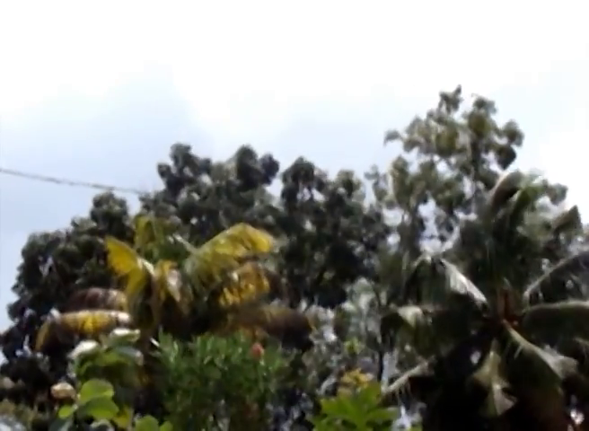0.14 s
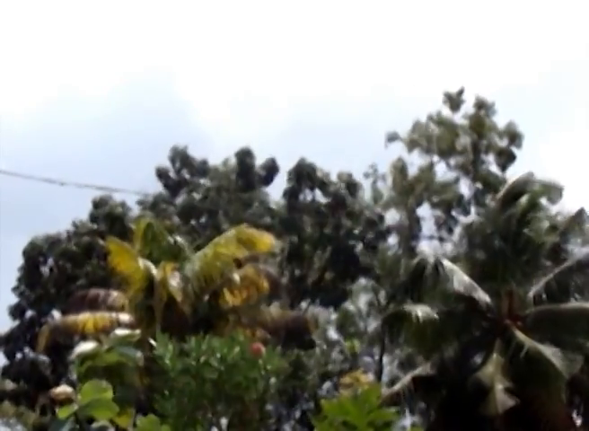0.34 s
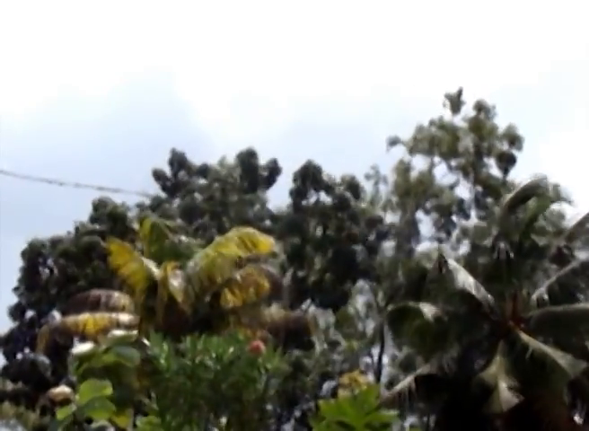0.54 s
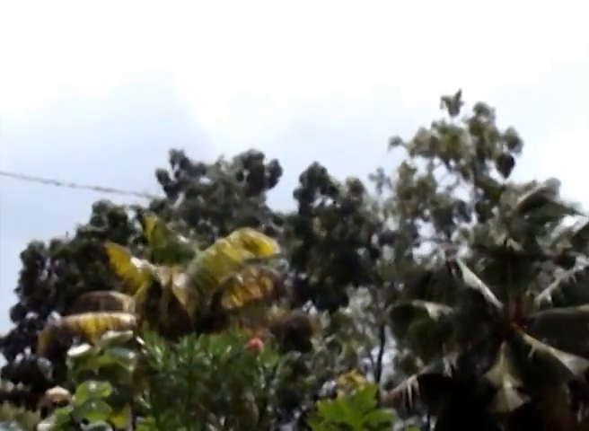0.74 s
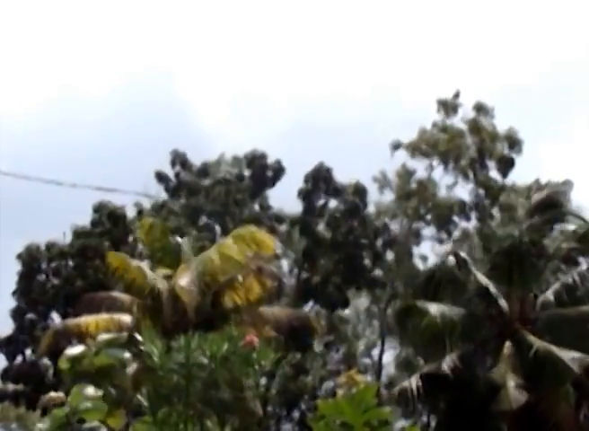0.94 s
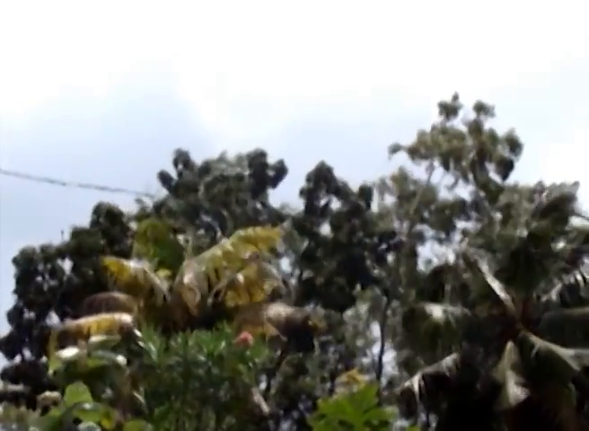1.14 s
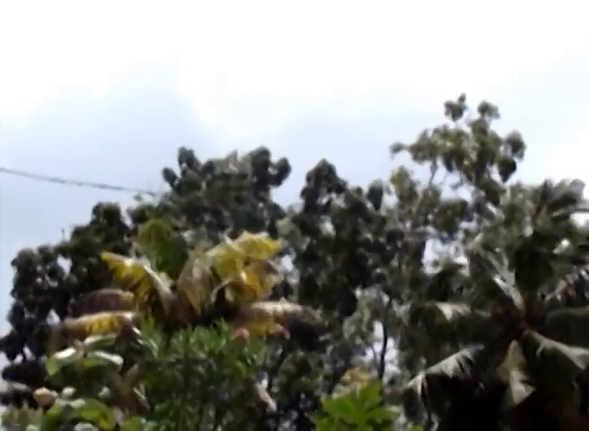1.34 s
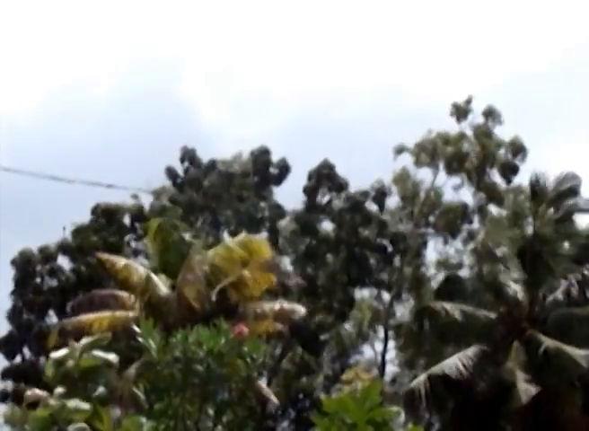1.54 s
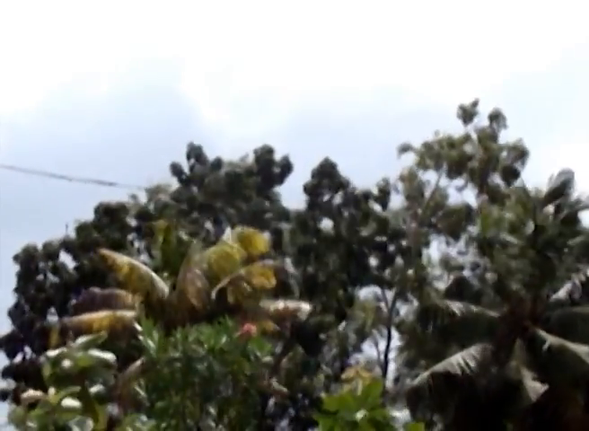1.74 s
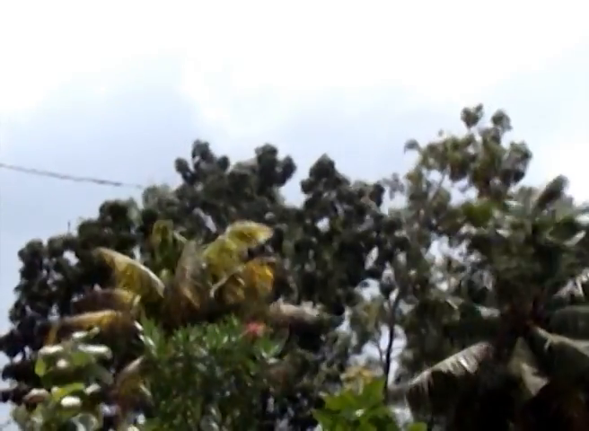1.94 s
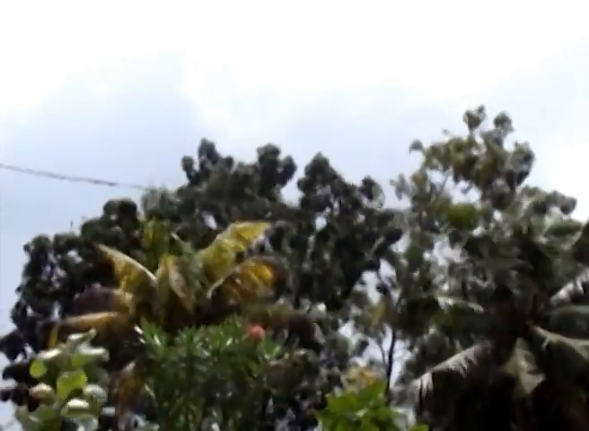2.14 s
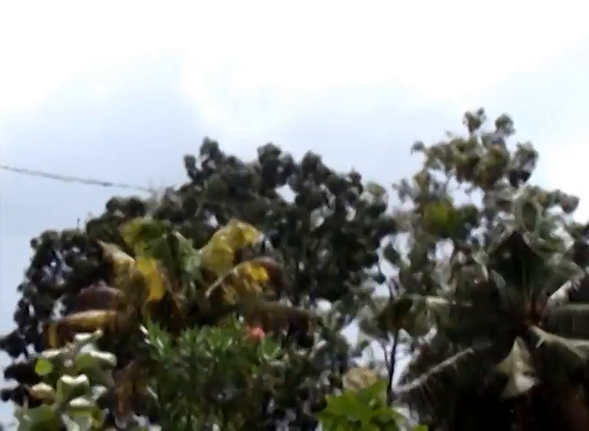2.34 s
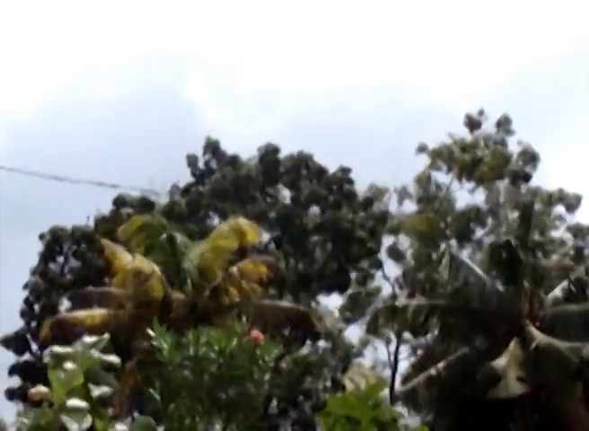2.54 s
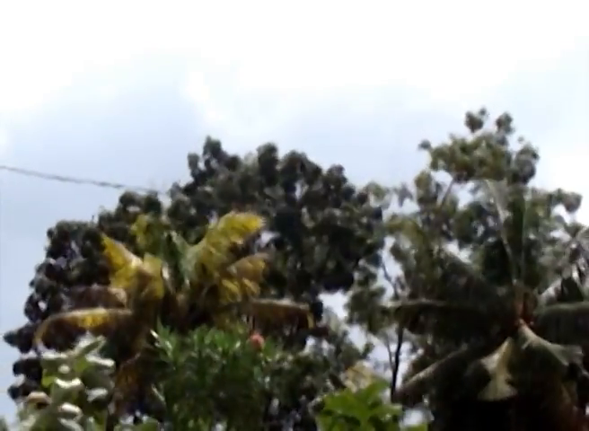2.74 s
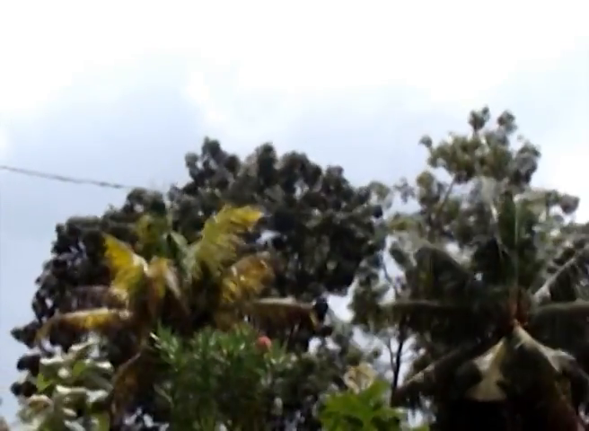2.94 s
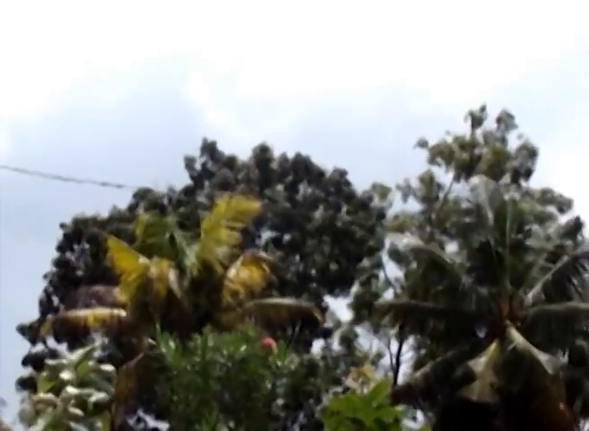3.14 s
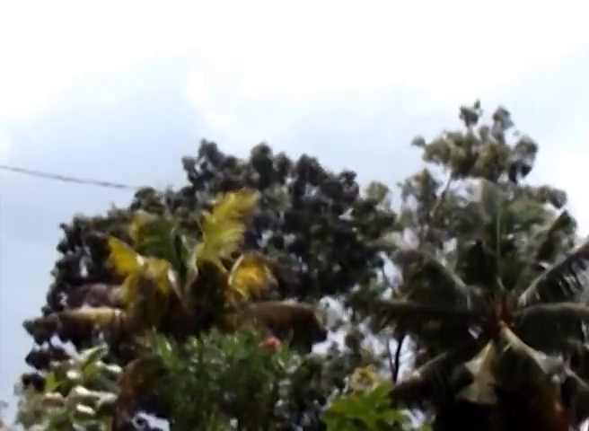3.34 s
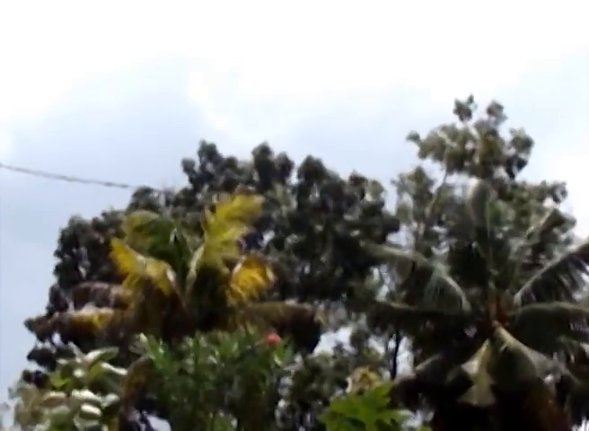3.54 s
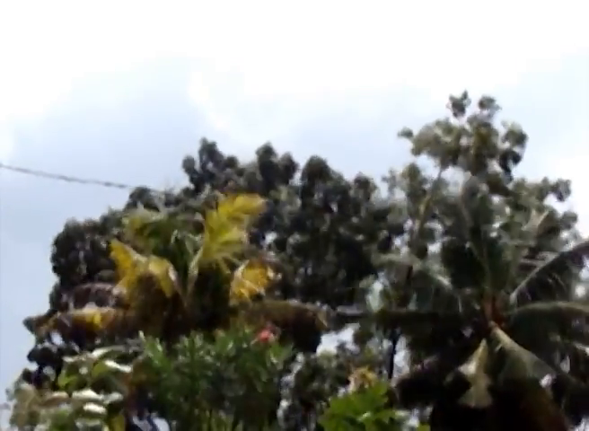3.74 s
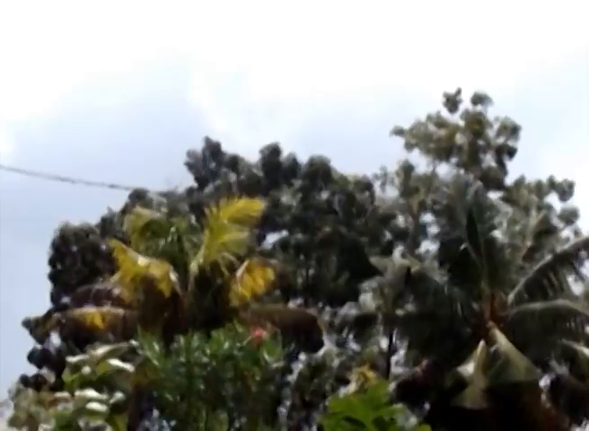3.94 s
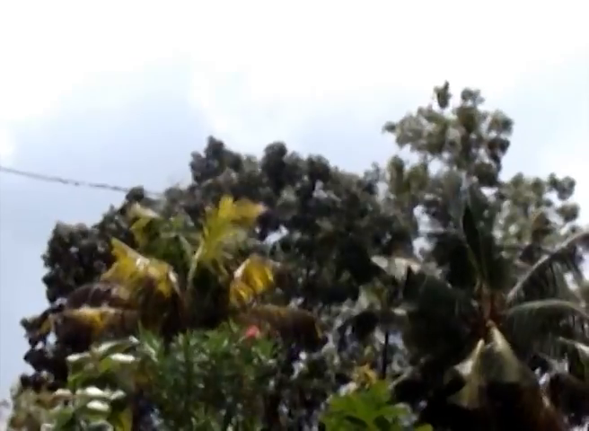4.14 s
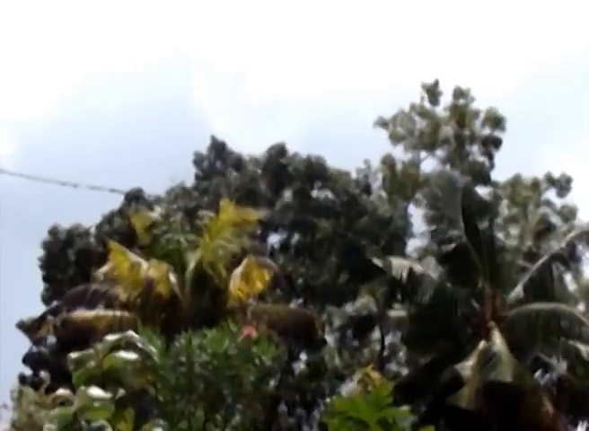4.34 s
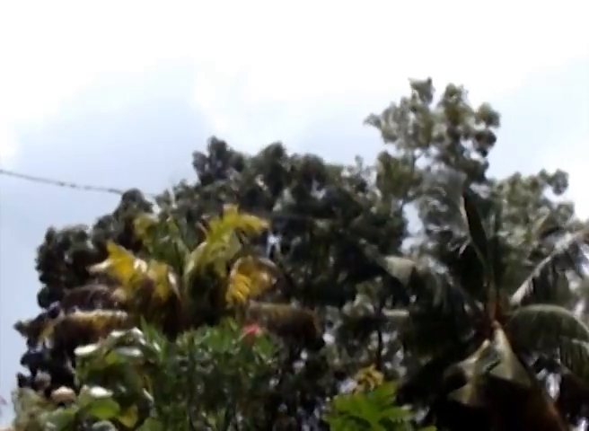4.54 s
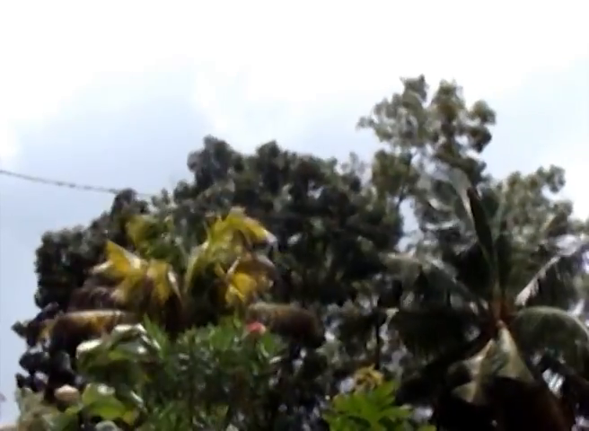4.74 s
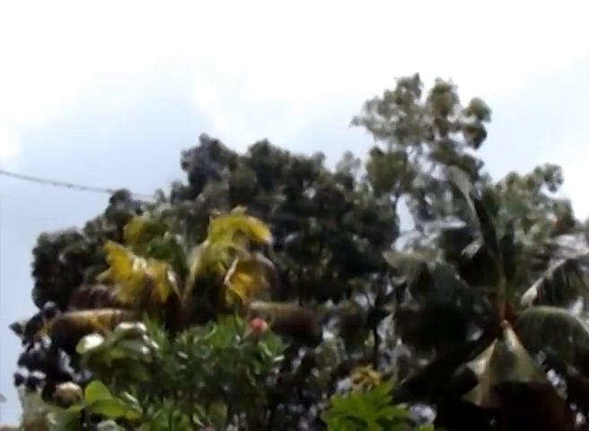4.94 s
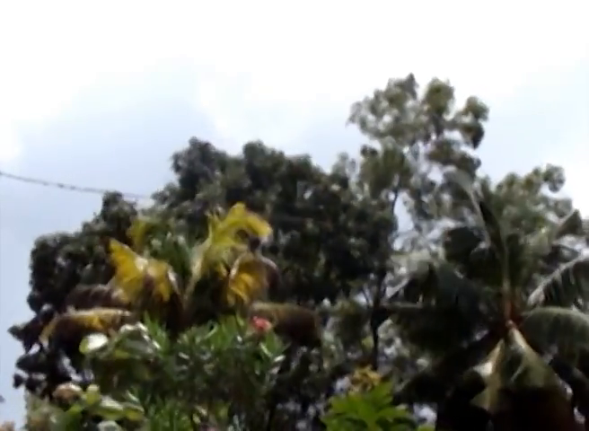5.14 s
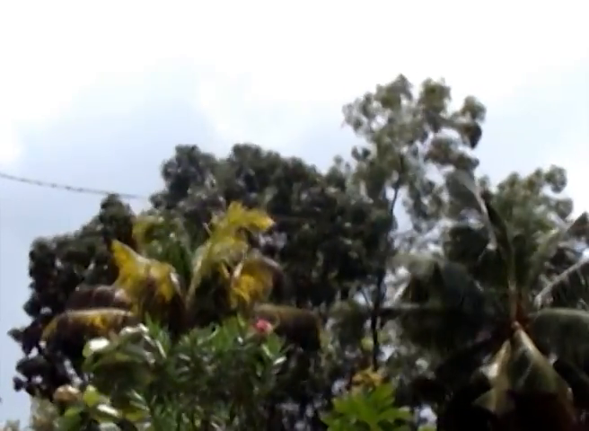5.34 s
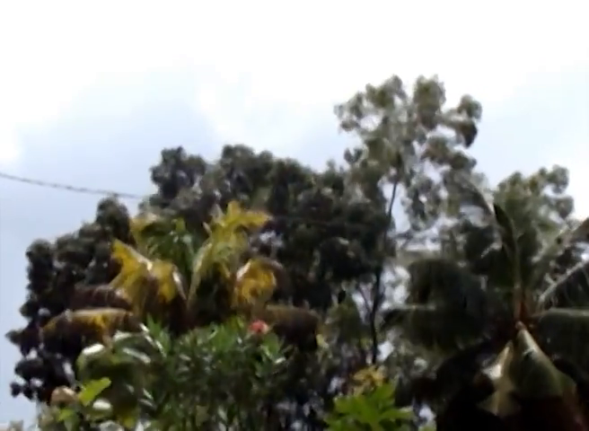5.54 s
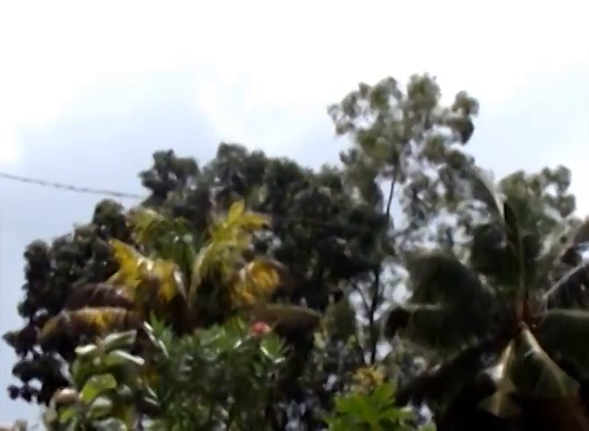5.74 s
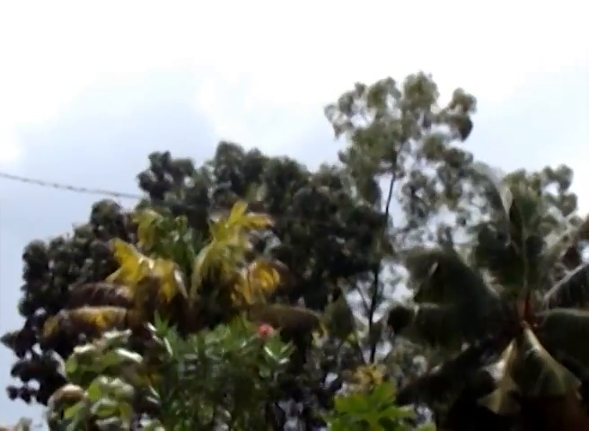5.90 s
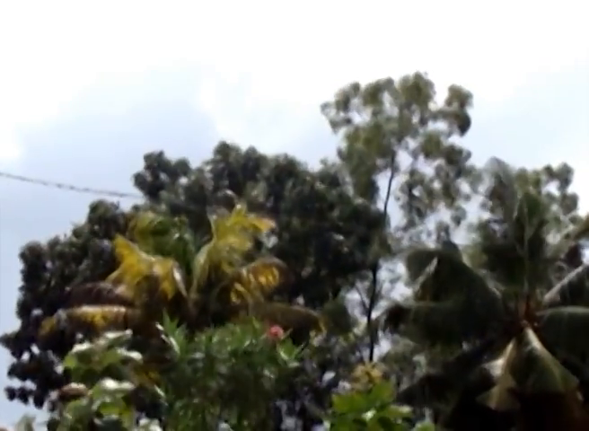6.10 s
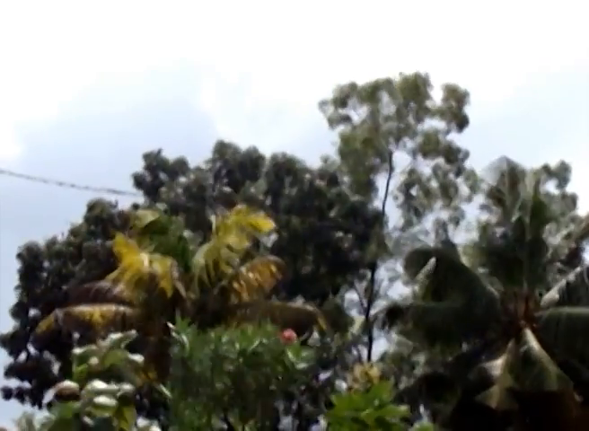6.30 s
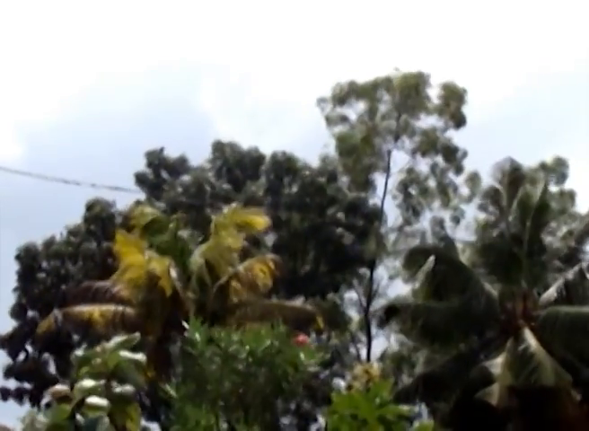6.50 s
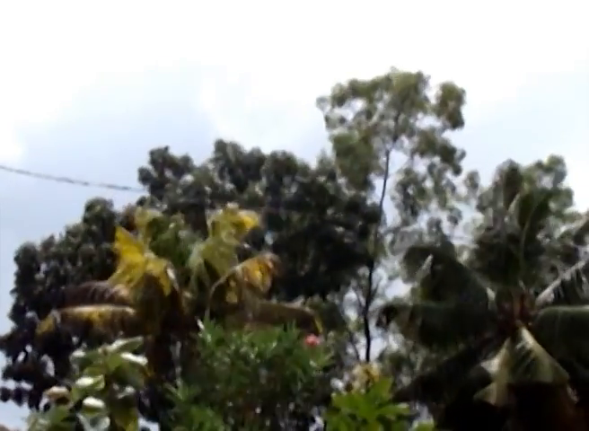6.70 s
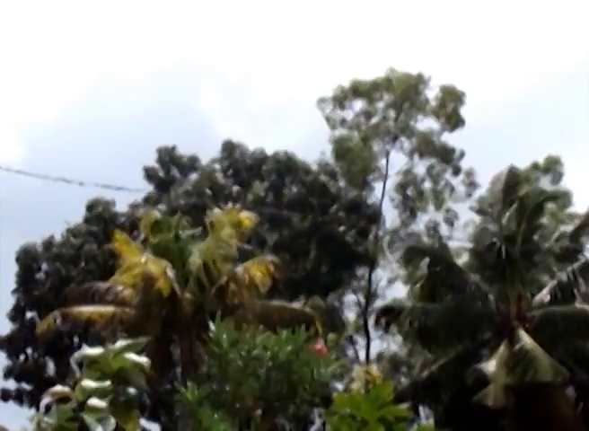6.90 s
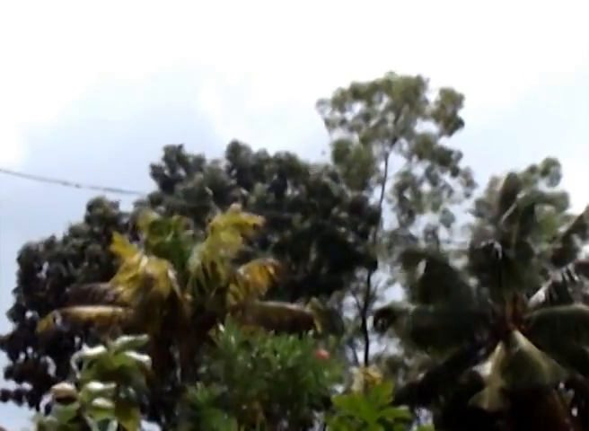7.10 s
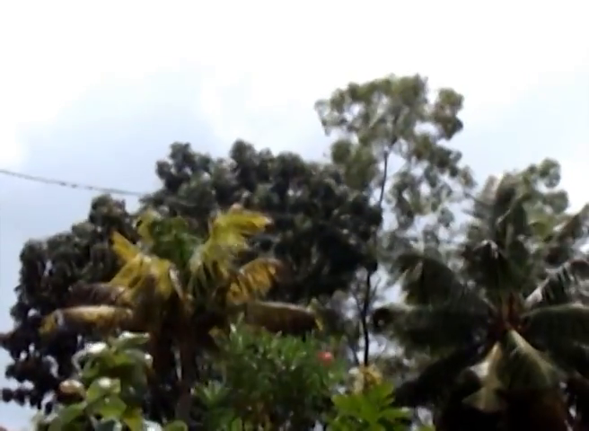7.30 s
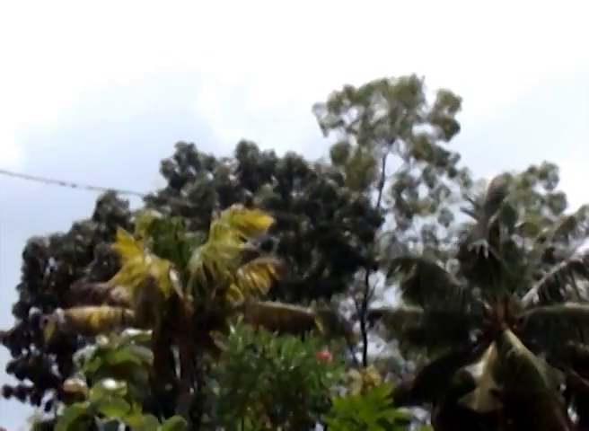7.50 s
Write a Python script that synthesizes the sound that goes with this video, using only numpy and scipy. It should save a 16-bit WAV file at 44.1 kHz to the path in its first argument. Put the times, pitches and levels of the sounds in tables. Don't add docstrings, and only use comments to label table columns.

```python
import sys
import numpy as np
from scipy import signal
from scipy.fft import rfft, irfft, next_fast_len
from scipy.io import wavfile
from scipy.ndimage import uniform_filter1d

SR = 44100
rng = np.random.default_rng(int(sys.argv[2]) if len(sys.argv) > 2 else 0)


def store_wav(level_fs):
    pcm = np.round(np.clip(np.atleast_2d(level_fs), -1, 1) * 32767)
    wavfile.write(sys.argv[1], SR, pcm.T.astype(np.int16))


def undo_db(level):
    steps = np.asarray(level, float) / 20
    return 10 ** steps


N = 337806
T = np.arange(N) / SR

# f/Hz, level/dB per Hz
CROWN_COLOUR = [(15, -71), (25, -37.5), (59, -15.5), (196, -9.5), (221, -7.5), (289, -5), (393, -2.5),
                (425, -3), (612, -2.5), (900, -1.5), (973, -0.5), (1070, 0), (2500, 3), (3250, -32.5),
                (5500, -120)]
RUMBLE_HZ = 241


def unit(x):
    return x / np.sqrt(np.mean(x ** 2))


def gate(start_s, length_s, attack_s, release_s):
    t = T - start_s
    return np.clip(np.minimum(t / attack_s, (length_s - t) / release_s), 0, 1)


def bump(centre_s, width_s):
    return np.exp(-((T - centre_s) / width_s) ** 2)


def walk(rate):
    hold = int(SR / rate)
    steps = np.repeat(rng.standard_normal(N // hold + 1), hold)
    slewed = uniform_filter1d(uniform_filter1d(steps, hold), hold)
    return unit(slewed[:N])


def foliage(drive, colour, lo_hz, hi_hz, shared_db, own_db, rate):
    size = next_fast_len(N)
    hz = np.maximum(np.arange(size // 2 + 1) * SR / size, 1)
    octave = np.log2(hz)
    colour_hz, colour_db = np.transpose(colour)
    edges = 1 / np.sqrt((1 + (lo_hz / hz) ** 8) * (1 + (hz / hi_hz) ** 8))
    tint = undo_db(np.interp(octave, np.log2(colour_hz), colour_db))
    spectrum = rfft(drive, size) * tint * edges
    out, sway = 0, walk(rate)
    for centre in np.arange(np.log2(lo_hz / 2), np.log2(min(hi_hz * 2, 11500)), 1 / 2):
        slice_gain = np.clip(1 - 2 * abs(octave - centre), 0, 1)
        sway = .9 * sway + .43 * walk(rate)
        flicker = undo_db(shared_db * sway + own_db * walk(20))
        out = out + flicker * irfft(spectrum * slice_gain, size)[:N]
    return unit(out)


def rustle(taps_per_s, spread_db, blur_db):
    is_hit = rng.random(N) < taps_per_s / SR
    strength = undo_db(spread_db * rng.random(N)) * rng.standard_normal(N)
    air = rng.standard_normal(N)
    return unit(is_hit * strength) + undo_db(blur_db) * air


def rumble():
    deep_hz = 166
    upper = foliage(rng.standard_normal(N), CROWN_COLOUR, deep_hz, RUMBLE_HZ, shared_db=.1, own_db=.6, rate=4)
    deep = foliage(rng.standard_normal(N), CROWN_COLOUR, 18, deep_hz, shared_db=.3, own_db=.2, rate=4)
    moan_s, moan_hz, sag_hz_per_s = .585, 218, 260
    t = T - moan_s
    moan = bump(moan_s, .07) * np.sin(2 * np.pi * (moan_hz - sag_hz_per_s * t / 2) * t)
    return undo_db(-51.5) * upper + undo_db(-55) * deep + np.sqrt(2) * undo_db(-46.5) * moan


def motor():
    # start t/s, length/s, firing rate f/Hz, climb/(Hz per s), level/dB
    pulls = [
        (2.3, 1.43, 96.5, 10.5, -48.5),
        (3.76, .2, 111, -10, -59),
        (4.0, .12, 110, 1, -50),
        (4.15, .29, 110, -18, -52.5),
    ]
    attack_s, release_s, second_db = .16, .04, -5
    waver = 1 + .0052 * walk(30)
    throb = undo_db(1.9 * walk(16))
    out = 0
    for start_s, length_s, firing_hz, climb, db in pulls:
        phase = 2 * np.pi * np.cumsum((firing_hz + climb * (T - start_s)) * waver) / SR
        throttle = gate(start_s, length_s, min(attack_s, length_s / 2), release_s)
        harmonics = np.sin(phase) + undo_db(second_db) * np.sin(2 * phase)
        out = out + throttle * undo_db(db) * harmonics
    return np.sqrt(2) * throb * out


def bird():
    start_s, length_s, level_db = 4.528, .09, -34
    t = np.clip(T - start_s, 0, length_s)
    scoop_hz = 250 * np.exp(-(t / .02) ** 2 / 2)
    droop_hz = 100 * np.exp((t - length_s) / .005)
    hz = 1925 - scoop_hz - droop_hz
    blip = .7 * bump(4.537, .007)
    envelope = gate(start_s, length_s, attack_s=.06, release_s=.005) + blip
    waver = 1 + .009 * walk(150)
    hoarse = undo_db(level_db + 1.5 * walk(90))
    return envelope * np.sqrt(2) * hoarse * np.sin(2 * np.pi * np.cumsum(hz * waver) / SR)


def wind():
    # t/s, strength as leaflet hiss level/dB
    gust = [(0.0, -25), (0.08, -26), (1.09, -23), (1.26, -20), (1.3, -21.5), (1.34, -19.5), (1.71, -21),
            (1.9, -19), (1.94, -20.5), (2.86, -19), (3.13, -21.5), (3.84, -23.5), (3.95, -23), (5.1, -27.5),
            (5.57, -27.5), (5.61, -27), (5.67, -28), (7.66, -29)]
    # f/Hz, level/dB per Hz
    leaf_colour = [(710, -38.5), (1200, -4), (2210, -3.5), (2420, -4), (4270, -8.5), (6360, -2.5),
                   (7140, -6.5), (10000, -26.5), (13000, -64.5), (22000, -120)]
    # centre t/s, width/s, extra level/dB
    surges = [
        (.2, .3, 0.4),
        (1.9, .4, -0.8),
        (2.92, .15, 1.3),
        (4.1, .15, -.8),
    ]
    flap_hz, hiss_hz = 1257, 3886
    near = rustle(taps_per_s=6000, spread_db=12, blur_db=5)
    hiss = foliage(near, leaf_colour, hiss_hz, 14000, shared_db=.61, own_db=.5, rate=13)
    flap = foliage(near, leaf_colour, flap_hz, hiss_hz, shared_db=.26, own_db=.4, rate=16)
    far = foliage(rng.standard_normal(N), CROWN_COLOUR, RUMBLE_HZ, flap_hz, shared_db=.5, own_db=-.84, rate=3.8)
    gust_s, gust_level = np.transpose(gust)
    gust_db = np.interp(T, gust_s, gust_level)
    above_calm_db = gust_db + 29
    flap_db = -35.5 + .78 * above_calm_db + sum(db * bump(s, width) for s, width, db in surges)
    far_db = -36.5 + .42 * above_calm_db
    return undo_db(gust_db - 1.5) * hiss + undo_db(flap_db) * flap + undo_db(far_db) * far


def scene():
    mono = rumble() + motor() + bird() + wind()
    return np.array([mono, mono])


def pitted(x, first, last, share, block):
    bands, lead = 32, 1006
    slow = signal.resample_poly(x, 320, 441)
    n = np.arange(16 * bands) - 8 * bands + .5
    k = np.arange(first, bands)[:, None]
    taper = np.cos(np.pi * n / bands) / (1 - (2 * n / bands) ** 2)
    bank = taper * np.cos(np.pi / bands * (k + .5) * n - (-1) ** k * np.pi / 4)
    bank = bank / np.linalg.norm(bank, axis=1, keepdims=True)
    frames = (len(slow) // (bands * block) + 2) * block
    where = np.arange(frames)[:, None] * bands + np.arange(len(n))
    padded = np.pad(slow, (lead, where.max()))
    sub = (padded[where] @ bank.T).reshape(-1, block, len(k))
    peak_db = 20 * np.log10(abs(sub).max(1, keepdims=True) + 1e-9)
    step = share * undo_db(2 * np.ceil(peak_db / 2))
    coarse = np.clip(np.round(sub / step), -1, 1) * step * (k.T < last)
    error = (coarse - sub).reshape(frames, -1) @ bank
    error = np.bincount(where.ravel(), error.ravel())[lead:lead + len(slow)]
    return x + signal.resample_poly(error, 441, 320)[:N]


def refilled(x, fill_db):
    # frame centre t/s, band centre f/Hz
    patches = [(0.248, 6920), (0.248, 8300), (0.48, 8650), (0.527, 6910), (0.55, 8970), (0.619, 5650),
               (0.666, 5100), (0.666, 5700), (0.712, 5640), (1.362, 7680), (1.455, 4640), (1.455, 6290),
               (1.455, 7670), (1.479, 4560), (1.502, 8240), (1.548, 6290), (1.548, 7000), (4.126, 7580),
               (4.172, 4620), (4.335, 7540), (4.335, 9050), (4.52, 6290), (4.52, 8920), (5.914, 4650),
               (5.914, 5170), (6.169, 6200), (6.169, 8980), (6.285, 6310), (6.633, 8230), (7.423, 6210),
               (7.493, 4930)]
    frame = 1024
    out = np.array([x, x])
    window = signal.windows.kaiser_bessel_derived(2 * frame, 4 * np.pi)
    hz = np.arange(frame + 1) * SR / 2 / frame
    turns = rng.random((len(patches), 2, frame + 1))
    for (s, centre_hz), turn in zip(patches, turns):
        at = slice(int(s * SR) - frame, int(s * SR) + frame)
        width_hz = min(.22 * centre_hz, 1380)
        band = rfft(out[:, at].mean(0) * window) * (abs(hz - centre_hz) < width_hz / 2)
        fill = undo_db(fill_db) * uniform_filter1d(abs(band), size=15) * np.exp(2j * np.pi * turn)
        out[:, at] += irfft(fill - band) * window
    return out


def low_pass(x):
    return signal.sosfilt(signal.butter(12, 10150, fs=SR, output="sos"), x)


def record(dry):
    camera = pitted(dry.mean(0), first=10, last=20, share=.71, block=36)
    mix = refilled(camera, fill_db=5)
    return low_pass(mix)


dry = scene()
out = record(dry)
store_wav(out)
```